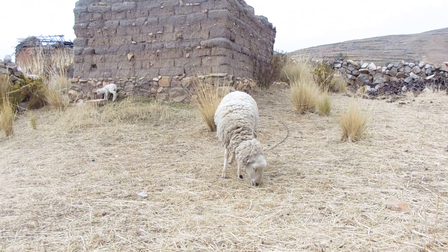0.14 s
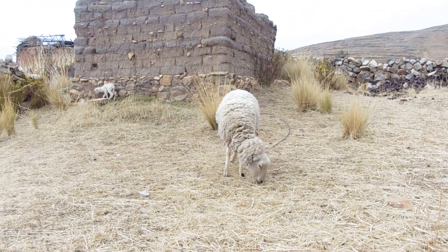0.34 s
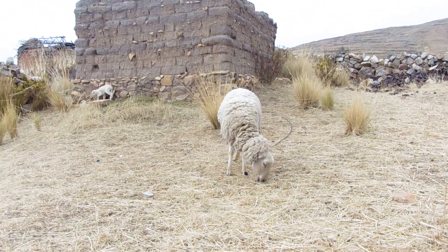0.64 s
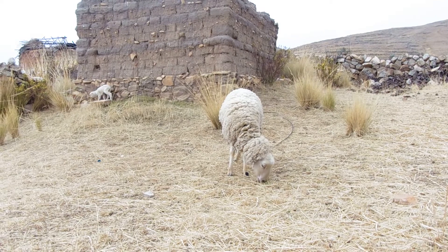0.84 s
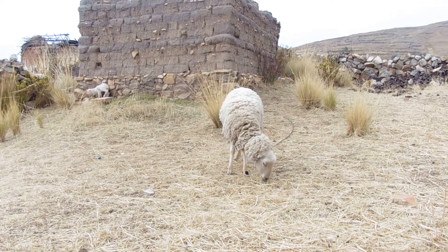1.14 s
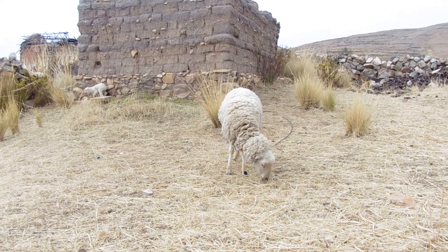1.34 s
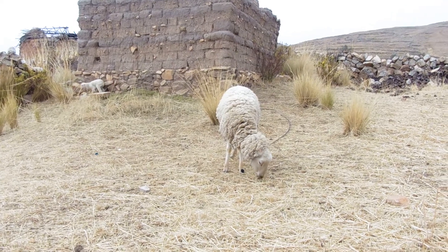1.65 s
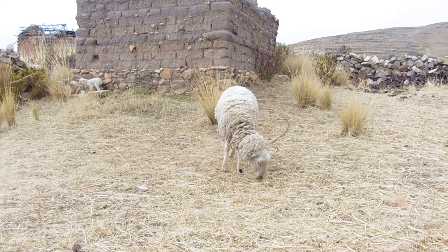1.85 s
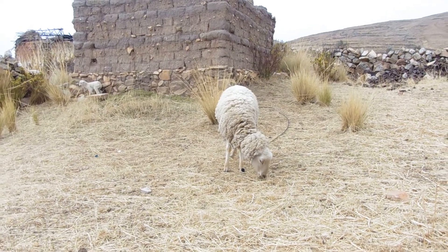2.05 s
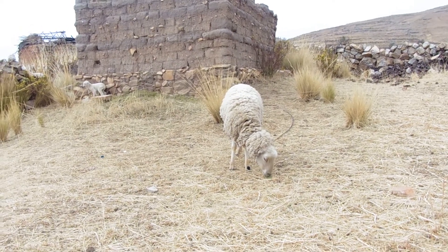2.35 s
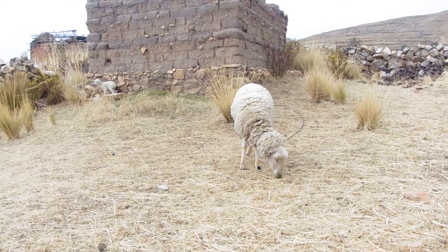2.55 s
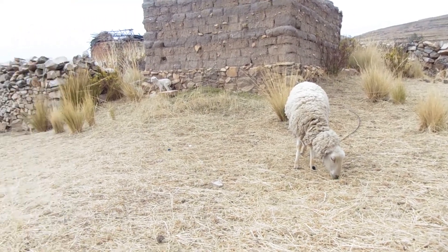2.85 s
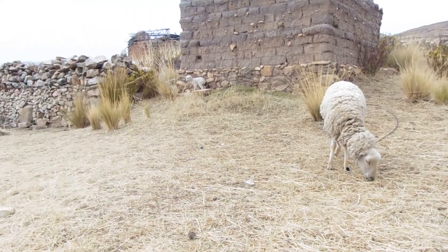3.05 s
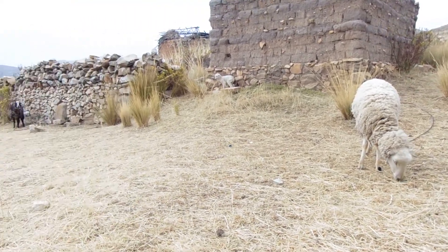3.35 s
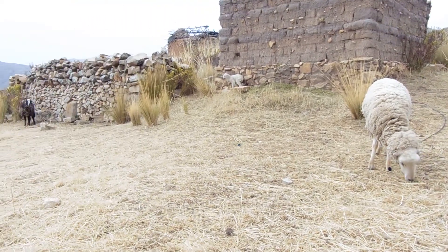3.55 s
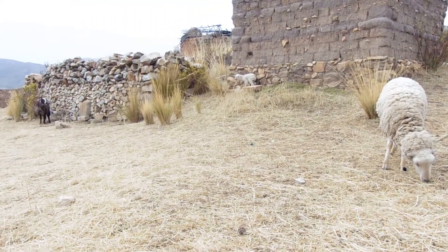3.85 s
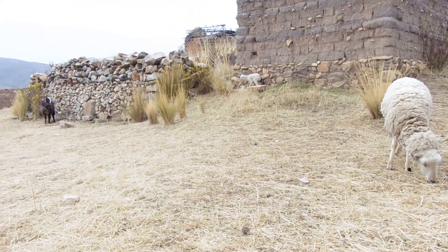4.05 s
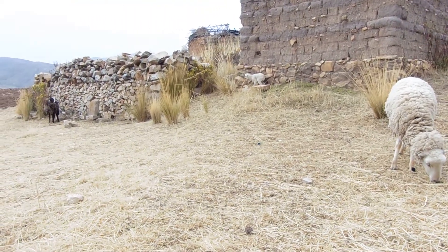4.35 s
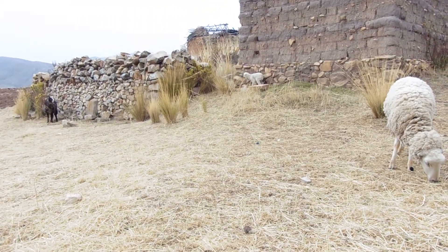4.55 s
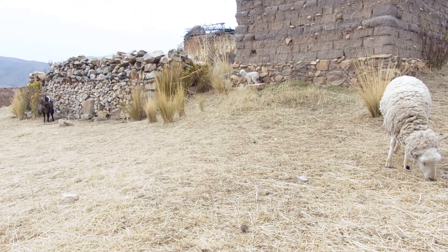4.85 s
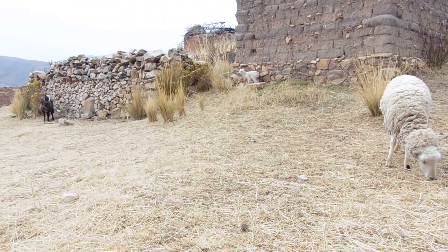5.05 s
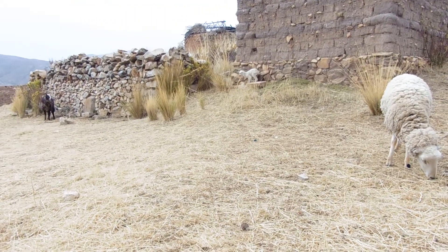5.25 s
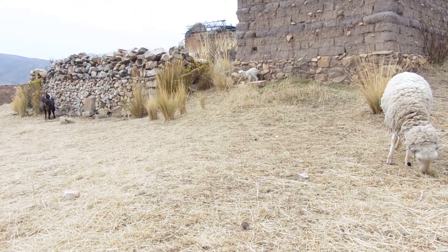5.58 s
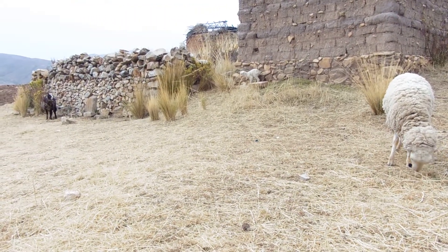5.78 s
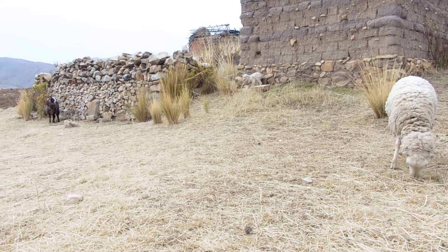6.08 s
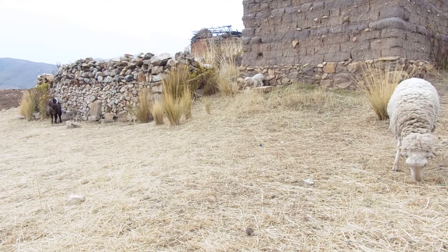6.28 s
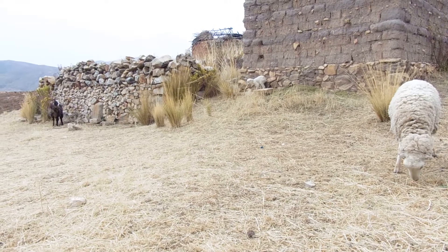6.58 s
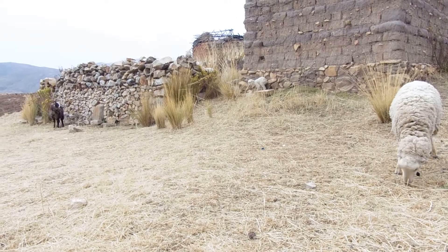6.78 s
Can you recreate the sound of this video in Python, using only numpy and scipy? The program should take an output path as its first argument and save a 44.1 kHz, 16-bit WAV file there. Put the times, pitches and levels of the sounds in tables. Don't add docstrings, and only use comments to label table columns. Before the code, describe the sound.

A quiet open hillside with dry grass and a brick wall, heard through one microphone with constant soft hiss and very faint low hum. At about 0.5 s a distant bird gives two tiny whistles, rising then falling. From 1.0 to 1.8 s a lamb bleats, high, clear and nasal, rising quickly to a plateau with rapid quavers. From 1.2 to 2.05 s a ewe answers beneath it, low and throbbing, first humming through the nose, then open-mouthed and rougher from about 1.6 s, fading at the end. Gentle grass rustle swells and dips. From 3.55 to 4.5 s the lamb bleats again, longer, louder and slightly higher, arching up then sinking as the mouth closes. Both animals have a short, faint outdoor reflection. Soft low wind puffs bump the microphone near 3.9, 4.5, 5.9 and 6.6 s. A dry stalk snaps at 5.65 s, with a barely audible after-crack; breeze and hiss continue to the end.

```python
import sys
import numpy as np
from scipy import signal
from scipy.fft import rfft, irfft
from scipy.io import wavfile
from scipy.ndimage import uniform_filter1d

SR = 44100
rng = np.random.default_rng(int(sys.argv[2]) if len(sys.argv) > 2 else 0)


def pcm_store(signal):
    levels = np.round(np.clip(np.atleast_2d(signal), -1, 1) * 32767)
    wavfile.write(sys.argv[1], SR, levels.astype(np.int16).T)


def ratio_of_db(decibels):
    return 10 ** (np.asarray(decibels, float) / 20)


N = 305172

# (start [s], end [s], swell [s], fade [s], tongue shift [s])
BLEATS = [
    (0.999, 1.832, 0.1, 0.076, 1.27),
    (3.548, 4.51, 0.041, 0.1, 4.33),
]
# (time [s], pitch [Hz])
LAMB_PITCH = [
    [(1.024, 359.5), (1.068, 436), (1.145, 476.6), (1.19, 467.7), (1.36, 489), (1.49, 489.2), (1.57, 475.2),
     (1.714, 486.8), (1.75, 458)],
    [(3.56, 423.6), (3.667, 491.2), (3.745, 505.8), (3.917, 521.4), (4.009, 509.4), (4.127, 512.1),
     (4.287, 491), (4.381, 484.2), (4.459, 469.4)],
]
# (time [s], effort [dB], mouth opening [0-1], lean to low throat ring [dB], throat stretch [-1..1])
LAMB_JAW = [
    [(1.07, -33.5, 0.79, -2.5, 0.92), (1.118, -30.5, 0.33, 7.5, -0.11), (1.224, -28, 0.08, 7, 0.34),
     (1.29, -27, 0.4, 10, 0.71), (1.45, -27.5, 0.52, 3.5, -0.31), (1.568, -30.5, 0.48, 2, -0.86),
     (1.642, -30.5, 0.55, 11.5, -0.39), (1.7, -28.5, 0.45, -1.5, -0.46), (1.758, -37.5, 0.61, -1, 0.82)],
    [(3.597, -31.5, 0.33, 2, -0.42), (3.657, -29.5, 0.61, -2.5, -0.27), (3.807, -25, 0.64, -6.5, -0.88),
     (3.899, -27, 0.67, -6, -1.02), (3.963, -25, 0.57, -0.8, 0.75), (4.14, -27.8, 0.58, -5, .7),
     (4.25, -27.5, 0.14, -2, -0.43), (4.317, -32, 0, -4, -0.12), (4.4, -32.5, 0.02, -2.5, -0.57)],
]
# (time [s], slip [Hz], change of low throat ring [dB])
QUAVERS = [(1.075, 6.2, 8), (1.159, 29, 2), (1.198, 3.8, 3), (1.279, 15, -4), (1.345, 5.2, -8),
           (1.386, 6, -8), (1.412, 17.3, 0), (1.43, 1, -18), (1.496, 15, -2), (1.527, 1.4, -16),
           (1.55, 8, -8), (1.59, 11, -5), (1.63, 11, -1), (3.61, 14, 3), (3.682, 20, 2), (3.76, 2.4, 5),
           (3.84, 10, -11), (4.28, 2.2, -2), (4.40, 5, 6)]
# (low throat [Hz], high throat [Hz], mouth [Hz], palate [Hz])
LAMB_WIDTHS_HZ = (476, 927, 570, 1500)
# (frequency [Hz], level [dB])
LAMB_TILT = [(400, 3), (1000, -3), (1600, 5), (2600, -5.5), (3200, 2.5), (4200, 0), (5500, -9.5),
             (7000, -6), (8500, -20.5), (14000, -21)]
# (before shift [Hz], after [Hz], level [dB], high throat ring at rest [Hz])
PALATE = [
    (2220, 2660, -38, 4674),
    (2090, 2300, -35.5, 4777),
]
# (centre [Hz], width [Hz], level re effort [dB], strongest at [s], half length [s])
LAMB_AIR = [
    (12500, 990, -39, 1.43, .16),
    (11500, 2200, -38.5, 4, .35),
]
# (centre [Hz], duration [share of bleat])
LAMB_POUCH = [
    (3300, 0.7),
    (2910, 0.41),
]
# (time [s], centre [Hz], half length [s], depth [0-1])
NULLS = [(1.19, 1880, 0.009, 1), (1.256, 1930, 0.029, 0.9), (1.626, 4800, 0.022, .85),
         (3.715, 3450, 0.0083, 0.4), (4.2, 5550, .022, .85), (4.287, 4930, 0.043, 1),
         (4.34, 6800, .025, .8), (4.377, 1490, 0.06, 0.9)]
# nose damping of second overtone [dB], chest fundamental [dB], top loss [dB], wobble [share]
LAMB_NOSE_DB = (-5.5, 0.2)
LAMB_CHEST_DB = (-49, -46)
LAMB_DULLING_DB = (3.5, 4)
LAMB_FLUTTER = (.003, .0015)
# (start [dB], end [dB])
LAMB_BREATH_DB = (-25, -27)
# (low [Hz], high [Hz])
STRETCH_HZ = (-250, 180)
# (time [s], pitch [Hz])
EWE_PITCH = [(1.2, 159.8), (1.4, 173.5), (1.63, 185), (1.81, 185.7), (1.88, 176), (2.0, 170.8), (2.05, 160)]
# (time [s], chest hum [dB], pitch lift [Hz], push on throat [dB])
THROBS = [(1.232, -55, 4.7, -6), (1.31, -76, 16.15, -6), (1.358, -53, 1.03, -8), (1.398, -52, 15, -2),
          (1.466, -43, 21.7, 15), (1.553, -43.5, 25.4, 15), (1.629, -43, 31.6, 3), (1.699, -49, 29, 7.5),
          (1.778, -48, 31, 7.5), (1.842, -46, 29, 9), (1.915, -50, 34, 6), (1.981, -73, 2.3, 4)]
# (centre [Hz], width [Hz], level [dB])
EWE_THROAT = [(1233, 96, -4.5), (2065, 300, 7.5), (2784, 213, 8)]
# (centre [Hz], width [Hz], level [dB])
EWE_TEETH = [(3450, 310, 3.5), (4130, 400, -9)]
# (mouth shut [dB], mouth open [dB], opening time [s], share of fade)
EWE_RINGS = [
    (-68, -44, 0.0086, 0.87),
    (-79, -40.5, 0.025, 1.16),
    (-76, -50, .04, 0.43),
]
# (time [s], peak [dB], frequency [Hz])
SNAPS = [
    (5.655, -35, 1340),
    (5.761, -60, 802),
]
# (time [s], level [dB], frequency [Hz])
PUFFS = [(3.865, -54, 59.2), (3.876, -48, 110), (3.94, -57, 80.6), (4.39, -60.5, 34.34), (4.52, -53, 59.3),
         (5.927, -56, 35.2), (6.58, -52, 50)]
# (time [s], level [dB], half length [s])
WIND = [(3.73, -59, .04), (3.88, -59, 0.06), (4.36, -67, .07), (4.53, -61, 0.034), (4.88, -72, 0.16),
        (5.12, -68, 0.092), (5.66, -69, .12), (6.1, -70.5, 0.27), (6.56, -67, 0.14), (6.87, -64, 0.084)]
# (time [s], level [dB], half length [s])
BREEZE = [(.66, -63, 0.17), (1.5, -54.5, 0.45), (2.15, -62, 0.28), (3.3, -63.5, .45), (4.2, -63, 0.42),
          (5.3, -61.5, 0.21), (6.6, -67, 0.089)]
# (time [s], length [s], from [Hz], to [Hz], level [dB])
CHIRPS = [
    (.545, .035, 2200, 2700, -58),
    (.592, .04, 2050, 1800, -56),
]
# (frequency [Hz], density [dB/Hz])
HISS = [(12, -20), (30, -13), (60, 0), (90, -13), (130, -5.5), (245, -2), (934, -1.5), (4700, -7),
        (9000, -12.5), (13500, -17), (15000, -19), (16000, -24)]
# (frequency [Hz], level [dB])
HUM = [(59.2, -85), (118.4, -74.5), (177.6, -76)]

SLIP_S, SLIP_HOARSE_DB_PER_HZ = .004, .5
DROOP_S, DROOP_HZ = .06, 69.6
SWELL_DB, FADE_DB = -40.5, -26
MOUTH_SHUT_DB, MOUTH_OPEN_DB, GAPE_S = -27, 8, 0.024
PALATE_PER_EFFORT, PALATE_MOUTH_DB = 0.5, 7.5
LOW_THROAT_HZ, TONGUE_SHIFT_S = 3857, 0.027
STRAIN_DB_PER_DB, LAMB_SHIMMER_DB = .5, 1.0
EWE_OPENS_S, EWE_TIRES_S, EWE_FADE_DB, EWE_FADE_BEND = 1.616, 1.917, -14, 1.56
EWE_JITTER, EWE_HOLD_S = .002, .0155
EWE_ROUGH, EWE_THROB_ROUGH, EWE_SHIMMER_DB = .045, .05, 1.0
EWE_PURSE, EWE_PURSE_S = 0.092, 2.005
BREEZE_LULL_DB, HISS_DB = -71.5, -54


def lamb_hz(t, end, pitch, flutter):
    at, slip_hz, _ = np.transpose(QUAVERS)[:, :, None]
    slips = -.5 * slip_hz * np.tanh((t - at) / SLIP_S) * np.exp(-abs(t - at) / 0.0174)
    droop = DROOP_HZ * np.clip(1 - (end - t) / DROOP_S, 0, 1) ** 1.5
    return (columns(pitch, t)[0] + slips.sum(0) - droop) * (1 + flutter * wander(len(t), 0.0094))


def lamb_breath(t, effort_db):
    at, slip_hz, _ = np.transpose(QUAVERS)[:, :, None]
    hoarse_db = SLIP_HOARSE_DB_PER_HZ * (slip_hz * bell(t, at, 0.013)).sum(0)
    hoarse_db += 9 * np.exp((t - t[-1]) / .03)
    hoarse_db += STRAIN_DB_PER_DB * np.maximum(effort_db + 30, 0)
    return ratio_of_db(np.linspace(*LAMB_BREATH_DB, len(t)) + hoarse_db)


def bleat(call, air, nose_db, roof, pitch, jaw, flutter, chest_db, dulling_db, pouch):
    start, end, swell, fade, shift = call
    t = np.arange(start, end, 1 / SR)
    progress = np.linspace(-.5, .5, len(t))
    hz = lamb_hz(t, end, pitch, flutter)

    effort_db, opening, lean_db, stretch = columns(jaw, t)
    opening = np.maximum(opening, np.exp(-((t - start) / GAPE_S) ** 4))
    edges_db = SWELL_DB * np.clip(1 - (t - start) / swell, 0, 1) ** 1.77
    edges_db += FADE_DB * np.clip(1 - (end - t) / fade, 0, 1) ** 3.6

    before_hz, after_hz, roof_db, rest_hz = roof
    palate_hz = before_hz + (after_hz - before_hz) * .5 * (1 + np.tanh((t - shift) / TONGUE_SHIFT_S))
    palate_db = roof_db + PALATE_PER_EFFORT * (effort_db + 29) + PALATE_MOUTH_DB * opening + edges_db

    effort_db = effort_db + edges_db
    at, _, dip_db = np.transpose(QUAVERS)[:, :, None]
    low_db = effort_db + .5 * lean_db + (dip_db * bell(t, at, 0.0069)).sum(0)
    high_db = effort_db - .5 * lean_db
    mouth_db = effort_db + MOUTH_SHUT_DB + (MOUTH_OPEN_DB - MOUTH_SHUT_DB) * opening
    low_hz = LOW_THROAT_HZ + STRETCH_HZ[0] * stretch
    high_hz = rest_hz + STRETCH_HZ[1] * stretch
    chest = ratio_of_db(chest_db) * signal.windows.tukey(len(t), .1) * (1 - bell(t, t[0], 0.065))

    low_width, high_width, mouth_width, palate_width = LAMB_WIDTHS_HZ
    pouch_hz, pouch_lasts = pouch
    air_hz, air_width, air_db, air_s, air_half = air
    teeth_gain = ratio_of_db(effort_db + air_db) * bell(t, air_s, air_half)
    near_nulls = [row for row in NULLS if start < row[0] < end]

    def tract(f):
        throat = ratio_of_db(low_db + 3.0) * ring(f, low_hz, low_width) ** 2
        throat = throat + ratio_of_db(high_db + 5) * ring(f, high_hz, high_width) ** 2
        front = ratio_of_db(mouth_db + 1.5) * ring(f, 1467, mouth_width) ** 2
        front = front + ratio_of_db(palate_db) * ring(f, palate_hz, palate_width) ** 2
        dull_db = -dulling_db * progress * np.clip((f - 5100) / 1200, 0, 1)
        damp_db = (nose_db + 9 * progress) * bell(f, 950, 250)
        out = ratio_of_db(read(LAMB_TILT, f) + dull_db + damp_db) * (throat + front)
        out = out * (1 - 1.06 * bell(progress, -.5, pouch_lasts) * abs(ring(f, pouch_hz, 360)))
        for s, centre_hz, half, depth in near_nulls:
            out = out * (1 - depth * bell(t, s, half) * bell(f, centre_hz, 260))
        return out + teeth_gain * ring(f, air_hz, air_width) ** 2 + chest * ring(f, 346, 210) ** 2

    sound = voice(hz, tract, lamb_breath(t, effort_db), LAMB_SHIMMER_DB, count=30)
    return t[0], sound * signal.windows.tukey(len(t), .03)


def ewe():
    t = np.arange(EWE_PITCH[0][0], EWE_PITCH[-1][0], 1 / SR)
    rest_hz = columns(EWE_PITCH, t)[0]
    opened = np.maximum(t - EWE_OPENS_S, 0)
    tired = np.clip((t - EWE_TIRES_S) / (t[-1] - EWE_TIRES_S), 0, 1)
    fade_db = EWE_FADE_DB * tired ** EWE_FADE_BEND
    throat_db, jaw_db, teeth_db = (
        open_db + (shut_db - open_db) * np.exp(-opened / lag) + share * fade_db
        for shut_db, open_db, lag, share in EWE_RINGS)

    at, hum_db, lift_hz, push_db = np.transpose(THROBS)[:, :, None]
    steps = np.exp(-abs((t - at) / EWE_HOLD_S) ** 3)
    held = steps.sum(0)
    hz = (rest_hz + (lift_hz * steps).sum(0)) * (1 + EWE_JITTER * wander(len(t), 0.011))
    hum = (ratio_of_db(hum_db) * bell(t, at, 0.014)).sum(0) + ratio_of_db(-64)
    push = ratio_of_db((push_db * np.exp(-abs((t - at) / 0.021) ** 4.3)).sum(0))
    purse = EWE_PURSE * .5 * (1 + np.tanh((t - EWE_PURSE_S) / 0.0093))
    jaw_hz = 815 - 90 * held
    jaw = ratio_of_db(jaw_db - 4 * held)

    def rings(f, modes):
        return sum(ratio_of_db(db) * ring(f, c * (1 + (c > 2500) * purse), w) ** 2 for c, w, db in modes)

    def tract(f):
        low = 1.44 * hum * ring(f, 210, 124) ** 2 + jaw * ring(f, jaw_hz, 206) ** 2
        return low + push * (ratio_of_db(throat_db) * rings(f, EWE_THROAT) + ratio_of_db(teeth_db) * rings(f, EWE_TEETH))

    rough = EWE_ROUGH + EWE_THROB_ROUGH * held * (t < EWE_TIRES_S)
    sound = voice(hz, tract, rough, EWE_SHIMMER_DB, count=30)
    return t[0], sound * signal.windows.tukey(len(t), .03)


def voice(hz, tract, rough, shimmer_db, count):
    size = len(hz)
    turns = np.cumsum(hz) / SR
    out = np.zeros(size)
    for k in range(1, count):
        smear = min(k / 8, 1) * (wander(size, .0006) + 1j * wander(size, .0006))
        uneven = ratio_of_db(shimmer_db * min(k / 8, 1.5) * wander(size, 0.013))
        out += (tract(k * hz) * uneven * (1 + rough * smear) * np.exp(2j * np.pi * k * turns)).real
    return out


def ring(hz, centre_hz, width_hz):
    return 1j * width_hz * hz / (centre_hz ** 2 - hz ** 2 + 1j * width_hz * hz)


def bell(x, centre, half):
    return np.exp(-((x - centre) / half) ** 2)


def read(points, hz):
    f, value = np.transpose(points)
    return np.interp(np.log(hz + 1), np.log(f + 1), value)


def columns(rows, t):
    s, *values = np.transpose(rows)
    return [np.interp(t, s, v) for v in values]


def evened(x):
    return x / np.sqrt(np.mean(x ** 2) + 1e-20)


def wander(count, seconds):
    size = max(int(seconds * SR), 1)
    return evened(uniform_filter1d(uniform_filter1d(rng.standard_normal(count), size), size))


def coloured(shape_db, size):
    hz = np.fft.rfftfreq(size, 1 / SR)
    return evened(irfft(rfft(rng.standard_normal(size)) * ratio_of_db(shape_db(hz)), size))


def gusts(rows, t):
    return sum(ratio_of_db(db) * bell(t, s, half) for s, db, half in rows)


def add(mix, s, sound):
    part = mix[round(s * SR):][:len(sound)]
    part += sound[:len(part)]


def hillside(x):
    t = np.arange(SR // 2) / SR
    tail = rng.standard_normal(len(t)) * ratio_of_db(-60 * t / 0.32) * (t > .02)
    taps = ratio_of_db(-22) * tail / np.linalg.norm(tail)
    taps[0] = 1
    taps[int(.0021 * SR)] = 0.035
    taps[int(.0113 * SR)] = 0.12
    return signal.oaconvolve(x, taps)[:N]


def snaps():
    out, t = np.zeros(N), np.arange(1300) / SR
    for s, db, hz in SNAPS:
        crack = np.sin(2 * np.pi * hz * t) * ratio_of_db(-60 * t / 0.014)
        rustle = 0.14 * rng.standard_normal(len(t)) * ratio_of_db(-60 * t / 0.028)
        add(out, s, ratio_of_db(db) * (crack + rustle))
    return out


def wind():
    t = np.arange(N) / SR
    rumble = coloured(lambda hz: 40 * np.log10(abs(ring(hz, 30, 52)) + 1e-5), N)
    out = gusts(WIND, t) * rumble
    u = np.arange(-2000, 2000) / SR
    for s, db, hz in PUFFS:
        add(out, s + u[0], ratio_of_db(db) * bell(u, 0, 0.011) * np.sin(2 * np.pi * hz * u))
    return out


def bird():
    out = np.zeros(N)
    for s, length, from_hz, to_hz, db in CHIRPS:
        hz = np.linspace(from_hz, to_hz, int(length * SR))
        whistle = np.sin(2 * np.pi * np.cumsum(hz) / SR)
        add(out, s, ratio_of_db(db) * signal.windows.tukey(len(hz), .6) * whistle)
    return out


def breeze():
    t = np.arange(N) / SR
    grass = coloured(lambda hz: 20 * np.log10(abs(ring(hz, 450, 1380)) + 1e-5), N)
    return (ratio_of_db(BREEZE_LULL_DB) + gusts(BREEZE, t)) * ratio_of_db(1.7 * wander(N, 0.035)) * grass


def hiss_and_hum():
    t = np.arange(N) / SR
    out = ratio_of_db(HISS_DB) * coloured(lambda hz: read(HISS, hz), N)
    for hz, db in HUM:
        level = np.sqrt(2) * ratio_of_db(db + 2.0 * wander(N, 0.012))
        out += level * np.sin(2 * np.pi * (hz * t + rng.random()))
    return out


def scene():
    flock = np.zeros(N)
    for call in zip(BLEATS, LAMB_AIR, LAMB_NOSE_DB, PALATE, LAMB_PITCH, LAMB_JAW,
                    LAMB_FLUTTER, LAMB_CHEST_DB, LAMB_DULLING_DB, LAMB_POUCH):
        add(flock, *bleat(*call))
    add(flock, *ewe())
    return (hillside(flock) + snaps() + wind() + bird() + breeze() + hiss_and_hum())[None]


def top_cut(x):
    return signal.sosfilt(signal.butter(12, 15720, fs=SR, output="sos"), x)


def record(dry):
    return top_cut(dry)


dry = scene()
out = record(dry)
pcm_store(out)
```